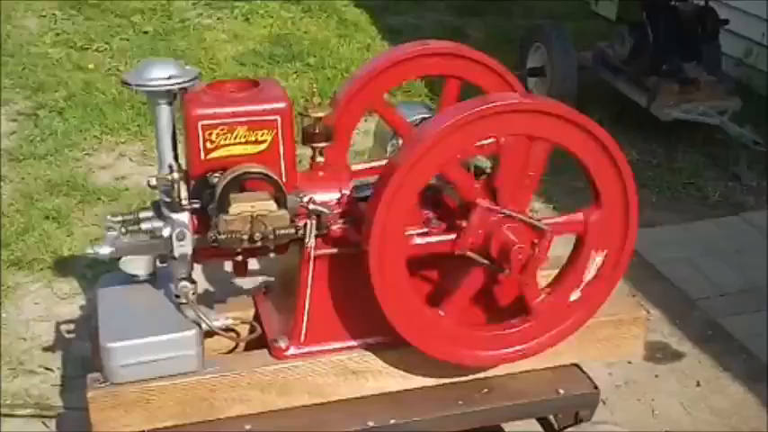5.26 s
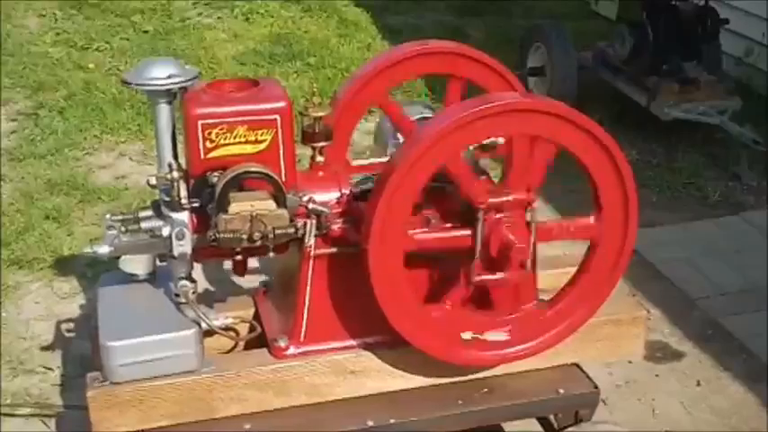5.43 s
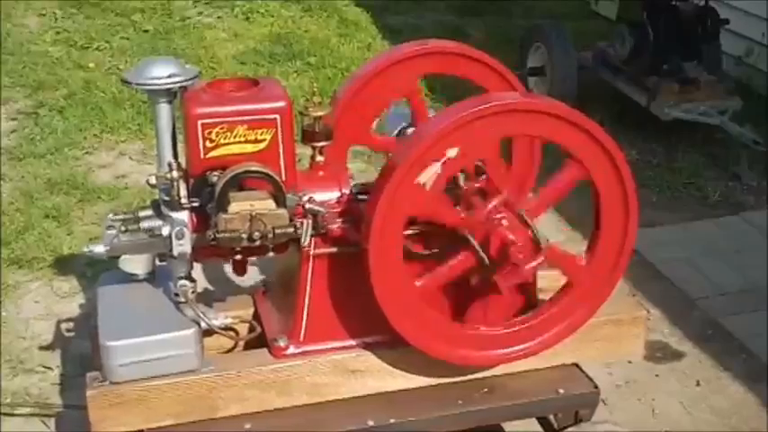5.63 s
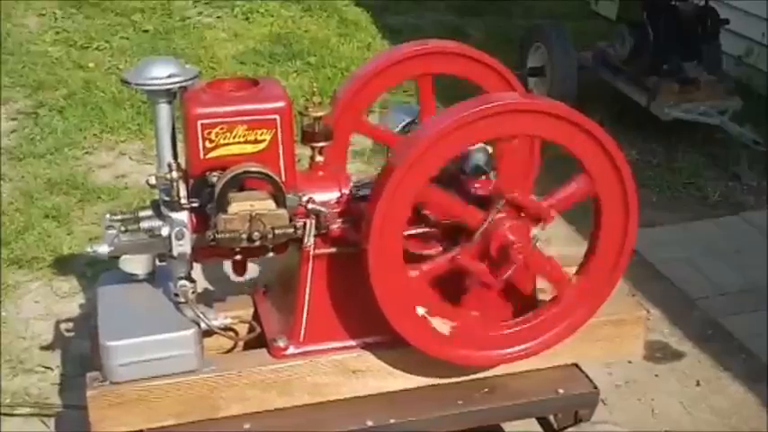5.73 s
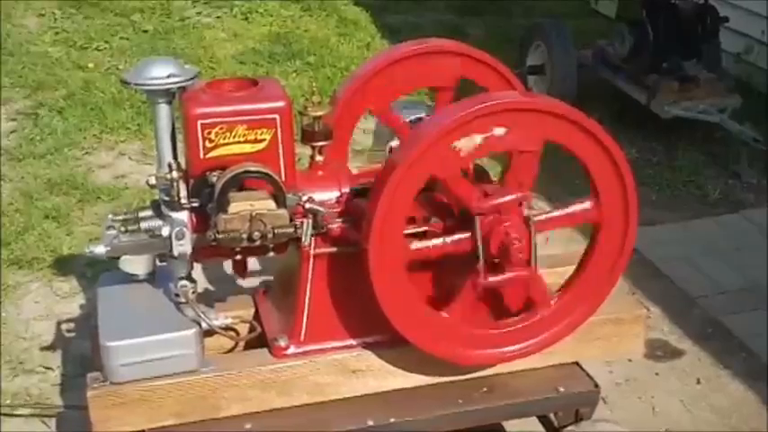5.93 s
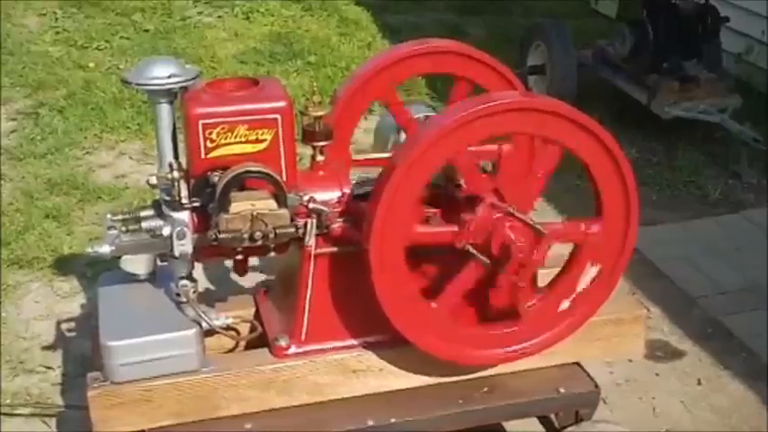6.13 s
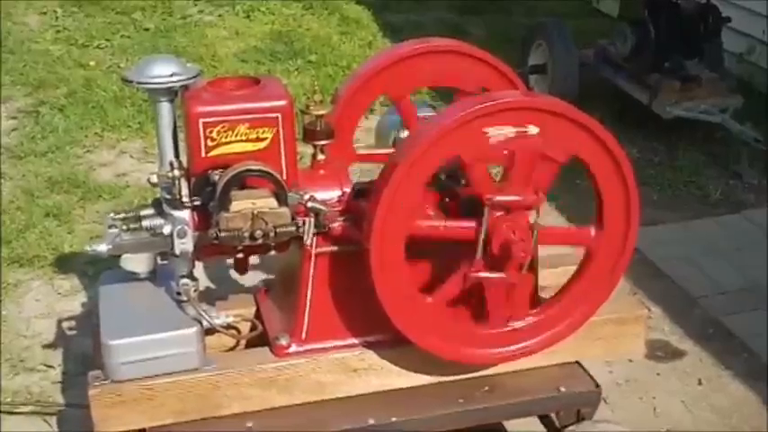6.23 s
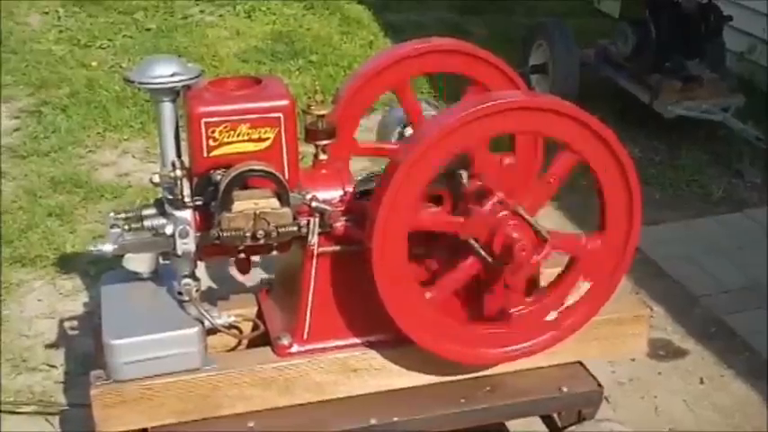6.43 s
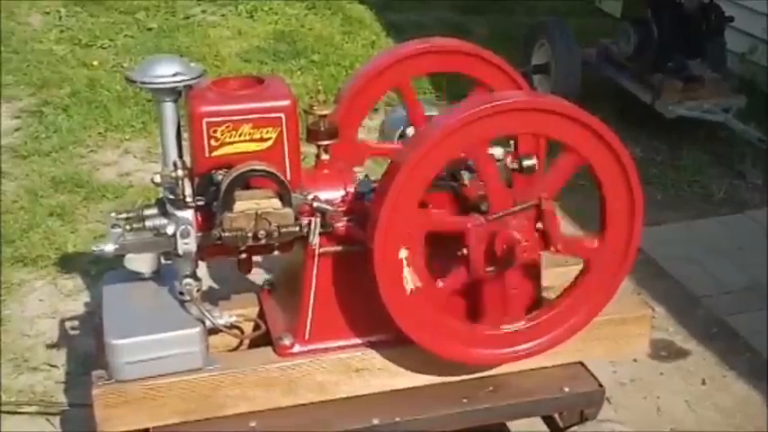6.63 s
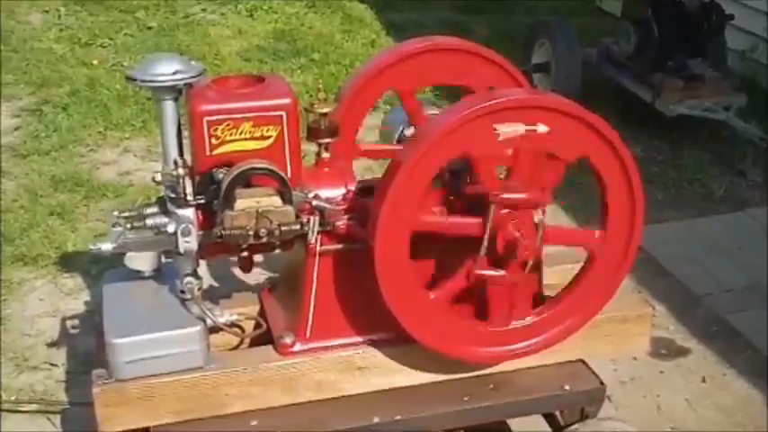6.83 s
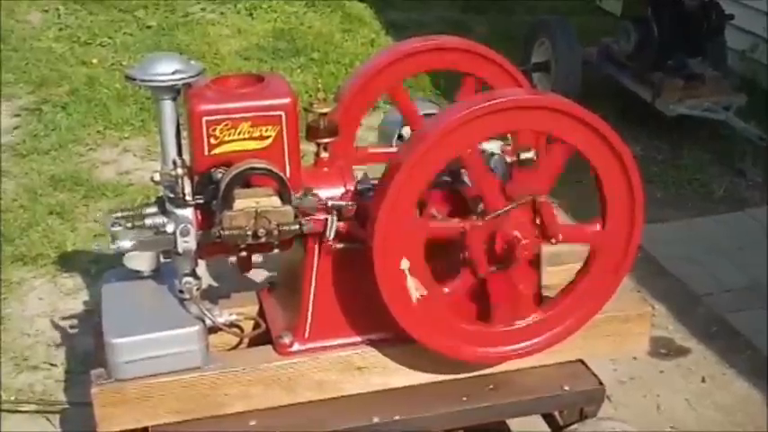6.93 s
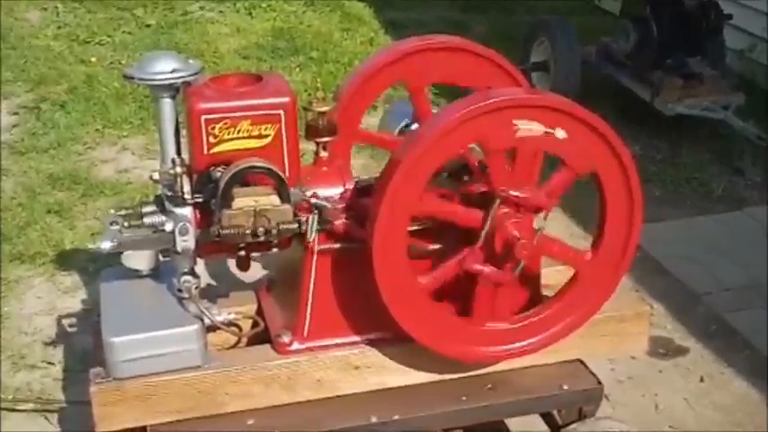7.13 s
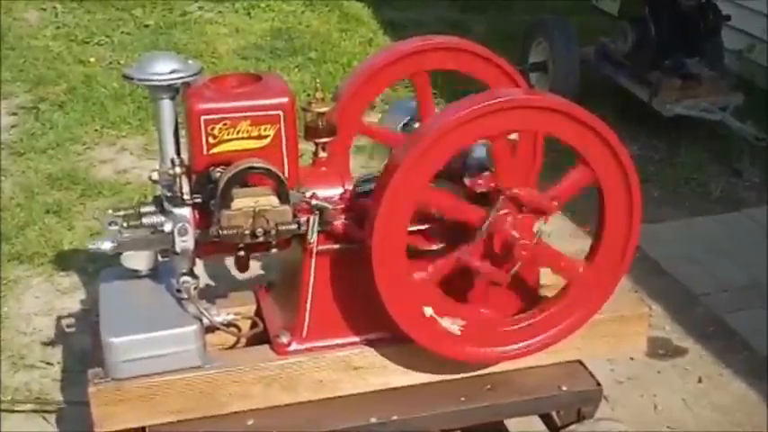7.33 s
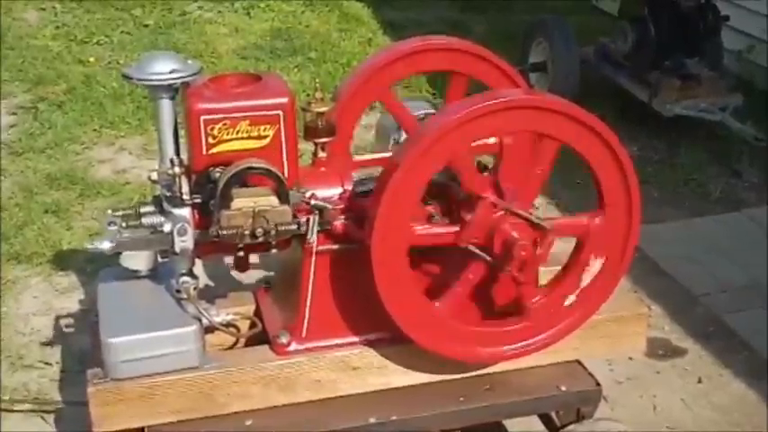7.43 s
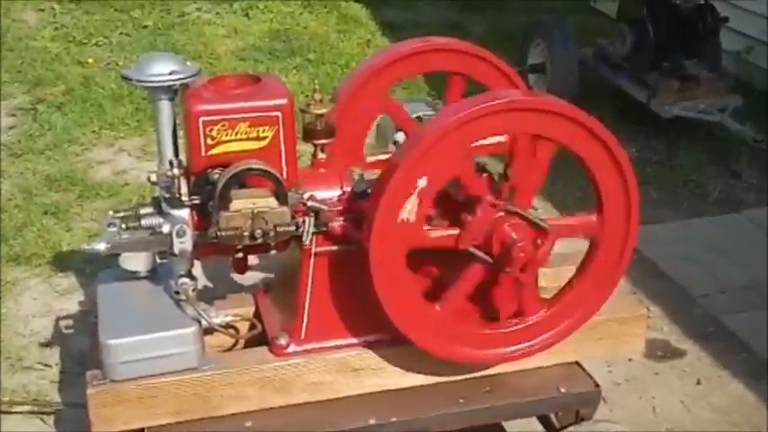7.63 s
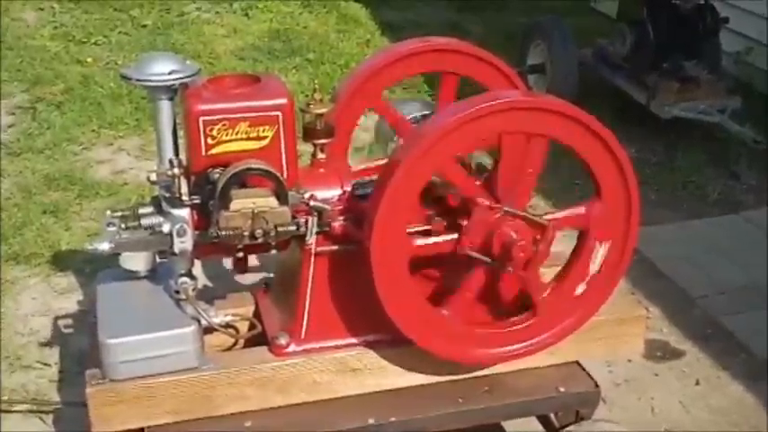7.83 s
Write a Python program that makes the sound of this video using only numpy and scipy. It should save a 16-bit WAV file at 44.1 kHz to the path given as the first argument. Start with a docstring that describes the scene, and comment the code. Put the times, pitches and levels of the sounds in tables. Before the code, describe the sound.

An old single-cylinder engine coasts with rhythmic iron clacks, fires with a loud bang, cuts to silence, then clacks on and fires again.

```python
"""A hit-and-miss engine coasts on a porch. Each turn of its slowing flywheels brings two clacks of the
valve gear, impacts that ring the iron, and two swells of sliding friction. It sucks in a charge past
a fluttering valve, trips its igniter and fires; the bang overloads the microphone, whose gain control
ducks. After a silent break the engine coasts on a lawn, its clacks drier, then fires once more and
runs on faster. Bearings hiss and the yard rumbles faintly in both places."""
import sys
import numpy as np
from scipy import signal
from scipy.fft import rfft, irfft, next_fast_len
from scipy.io import wavfile
from scipy.ndimage import uniform_filter1d

SR = 44100
rng = np.random.default_rng(int(sys.argv[2]) if len(sys.argv) > 2 else 0)


def unload_wav(signal):
    """Save mono or channel-first audio to the path in sys.argv[1] as 16-bit WAV at rate SR, clipped to [-1, 1]."""
    wavfile.write(
        sys.argv[1],
        SR,
        np.round(np.clip(np.atleast_2d(signal).T, -1, 1) * 32767).astype(np.int16),
    )


N = 347067
BREAK_S = (2.6, 3.364)  # start and end of the silence
TOP_HZ, USUAL_TURN_S = 15450, .28

# Coasting runs. Each row: start, end, first turn's length and lengthening per turn, all in seconds.
PORCH_COASTS = [(0.0055, 2.4, .2899, .00405)]
# Resonances of castings, skid and surroundings, then of steel rods and springs.
# Each row: centre in Hz, width in Hz, boost or dip in dB.
PORCH_PEAKS = [(251.6, 40.0, 21), (420, 63, 17.5), (580, 230, 7), (703, 107, 15), (836, 13, 16.5),
               (893, 27, 9.5), (937, 33, 11), (1070, 43.0, 1.5), (1260, 42.0, 9.5), (1340, 330, -13),
               (1469, 423, 31.5), (2362, 88, 7.5), (2700, 51.0, 6), (2955, 91, 7.5), (5370, 110, 2),
               (6230, 270, 0), (8235, 270, 9.5), (9770, 692.0, 10), (10860, 170, 10.5), (14281.0, 268.0, 2)]
STEEL_MODES = [(1960, 13, 6.5), (2297, 120, 4.5), (2564, 30, 2), (3337, 21, -10), (3750, 19, -3.5),
               (5650, 100, -1), (6360, 130, 8), (8774, 65, 8.5), (8700, 45, -10.5), (9000, 45, 0.5),
               (9300, 76, -6), (12000, 70, 6), (11967, 54, 6), (12646, 60, 9), (14000, 88, 14.5)]
# Modes of the igniter and its lever. Each row: centre in Hz, width in Hz, boost in dB.
IGNITER_MODES = [(423, 40, 13.5), (697, 70, 15.5)]
# Spectra of the two clacks, the rubbing and the lever trips. Each row: frequency in Hz, level in dB.
PORCH_FIRST_CLACK = [(60.0, -29), (130.0, -29.5), (240.0, 0), (450.0, -8.5), (750.0, -2.5), (1100.0, -1.5),
                     (1600.0, -5.5), (2600.0, 0), (3500.0, -7.5), (6000.0, -7.5), (9500.0, -15.5),
                     (15000.0, -22.5)]
PORCH_SECOND_CLACK = [(60.0, -25), (130.0, -31), (240.0, -2.5), (450.0, -18.5), (750.0, -9),
                      (1100.0, -17.5), (1600.0, -14), (2600.0, -7.5), (3500.0, -11), (6000.0, -14),
                      (9500.0, -19), (15000.0, -27.5)]
PORCH_RUB = [(60.0, -41), (130.0, -23), (240.0, -2.5), (450.0, -12.5), (750.0, -10), (1100.0, -7.5),
             (1600.0, -20), (2600.0, -20), (3500.0, -30.5), (6000.0, -32), (9500.0, -38.5), (15000.0, -43)]
TRIP_SPECTRUM = [(60, -13.5), (250, -3), (450, -2), (850, -6.5), (1500, -1.5), (3000, -4.5), (6000, -8.5),
                 (10000, -8.5), (15000, -17)]
# Friction swells of the low, middle and high band.
# Each row: first swell as a share of the turn, swing in dB, bias to the outward stroke in dB.
PORCH_SWELLS = [(0.32, 4, 1.5), (0.27, 4.5, 1.5), (0.3, 1, 3)]
# Knocks of loose play in gears and bearings. Each row: share of the turn, level in dB.
PORCH_KNOCKS = [(.54, -26), (.62, -33), (.80, -34), (.955, -27.5)]
# Trips of valve lever and igniter before the firing. Each row: start in seconds, level in dB.
PORCH_TRIPS = [(2.075, -15.5), (2.401, -15.5)]


def porch():
    """Impact and friction excite resonances; under the roof the clacks ring longer and the skid booms."""
    turns, peaks = flywheel(PORCH_COASTS), np.vstack([PORCH_PEAKS, STEEL_MODES])
    first, second = valve_gear(turns, PORCH_KNOCKS, first_db=-12, second_db=-18.5, second_share=.246,
                               tail_db=-2.5, rise_s=.006, bright_s=.005, fresh=.6, t60=.17)
    clacks = coloured(first, PORCH_FIRST_CLACK, peaks) + coloured(second, PORCH_SECOND_CLACK, peaks)
    lever = blows(PORCH_TRIPS, rise_s=.0058, bright_s=.0056, fresh=1.9, tail_db=3, t60=.21)
    trips = coloured(lever, TRIP_SPECTRUM, np.vstack([peaks * [1, 1, .5], IGNITER_MODES]))
    rub = amp(-22.5) * rubbing(turns, PORCH_SWELLS, PORCH_RUB, peaks, depth=.5, grit_db=1)
    swish = piston_swish(turns, .745, .073, glide_hz=(1064, 797), width_hz=270, tone_db=-25.5, hiss_db=-41)
    return clacks + trips + rub + swish


# Coasting runs. Each row: start, end, first turn's length and lengthening per turn, all in seconds.
LAWN_COASTS = [(3.2552, 7.1, .2557, .003665), (7.172, 7.87, .264, .0025)]
# Ringing resonances of the engine, plus broad treble boosts that brighten the clacks.
# Each row: centre in Hz, width in Hz, boost in dB.
LAWN_PEAKS = [(222, 40, 6.7), (268.7, 85, 13.7), (372.3, 28, 10.7), (504, 20, 8.4), (678, 64, 7.3),
              (877, 33, 7.6), (973, 71, 7), (1087, 33, 7.8), (1279, 25, 9.6), (1353, 53, 7.7),
              (1537, 136, 9.1), (1900, 317, 8.6), (2500, 505, 20), (2755, 185, 8.1), (3210, 42, 11.7),
              (5300, 210, 3.1), (5840, 100, 8.5), (8940, 2470, 14), (9760, 1000, 12.3), (10880, 2000, 8.9)]
# Spectra of the two clacks and the rubbing. Each row: frequency in Hz, level in dB.
LAWN_FIRST_CLACK = [(60.0, -37), (130.0, -33), (240.0, -21.5), (450.0, -13), (750.0, -0.5), (1100.0, -7),
                    (1600.0, -10), (2600.0, -26.5), (3500.0, -21), (6000.0, -17.5), (9500.0, -41.5),
                    (15000.0, -30)]
LAWN_SECOND_CLACK = [(60.0, -33), (130.0, -26), (240.0, -26), (450.0, -19), (750.0, -0.5), (1100.0, -12),
                     (1600.0, -14.5), (2600.0, -31.5), (3500.0, -24.5), (6000.0, -25), (9500.0, -44.5),
                     (15000.0, -37)]
LAWN_RUB = [(60.0, -49), (130.0, -11), (240.0, -12), (450.0, -9.5), (750.0, 1), (1100.0, -8.5),
            (1600.0, -19), (2600.0, -35), (3500.0, -31.5), (6000.0, -34.5), (9500.0, -56), (15000.0, -38)]
# Friction swells by band. Each row: share of the turn, swing in dB, outward bias in dB.
LAWN_SWELLS = [(0.3, 2, 1.2), (0.25, 3.5, 1.7), (0.34, 2.6, 2.4)]
# Knocks of loose play; those just before a clack take up slack. Each row: share of the turn, level in dB.
LAWN_KNOCKS = [(.215, -40), (.49, -33), (.585, -31.5), (.785, -33), (.975, -30)]
# Trips of valve lever and igniter. Each row: start in seconds, level in dB.
LAWN_TRIPS = [(6.977, -28), (7.126, -25), (7.133, -17)]


def lawn():
    """In the open the clacks decay sooner and sound thinner, and both piston strokes swish."""
    turns, peaks = flywheel(LAWN_COASTS), np.vstack([LAWN_PEAKS, STEEL_MODES])
    first, second = valve_gear(turns, LAWN_KNOCKS, first_db=-14.5, second_db=-18, second_share=.243,
                               tail_db=-7.5, rise_s=.0049, bright_s=.0033, fresh=.83, t60=.13)
    clacks = coloured(first, LAWN_FIRST_CLACK, peaks) + coloured(second, LAWN_SECOND_CLACK, peaks)
    lever = blows(LAWN_TRIPS, rise_s=.0074, bright_s=.0027, fresh=.84, tail_db=-8, t60=.26)
    trips = coloured(lever, TRIP_SPECTRUM, IGNITER_MODES)
    rub = amp(-27.5) * rubbing(turns, LAWN_SWELLS, LAWN_RUB, peaks, depth=.75, grit_db=2)
    inward = piston_swish(turns, .715, .06, (844.4, 633.6), width_hz=204, tone_db=-22.5, hiss_db=-45)
    scrape = piston_swish(turns, .775, .064, (1038, 1649), width_hz=640, tone_db=-30.5, hiss_db=-57)
    outward = piston_swish(turns, .34, .061, (957, 539), width_hz=53, tone_db=-33, hiss_db=-74)
    return clacks + trips + rub + inward + scrape + outward


def flywheel(coasts, db_per_doubling=3.5, fired_db=1):
    """Friction slows the wheels and level follows speed. Each row: a turn's start s, length s, dB."""
    turns = []
    for firings, (start, end, length, lengthening) in enumerate(coasts):
        while start < end:
            level = db_per_doubling * np.log2(USUAL_TURN_S / length) + fired_db * (firings > 0)
            turns.append((start, length, level))
            start, length = start + length, length + lengthening
    return np.array(turns)


def at_share(turns, share):
    """Times at which the crank passes a share of each turn."""
    starts, lengths, _ = turns.T
    return starts + share * lengths


def each_turn(turns, share, db, scatter_db=-.15):
    """Periodic impacts (s, dB) at one crank angle, no two equally hard."""
    return zip(at_share(turns, share), db + turns[:, 2] + scatter_db * noise(len(turns)))


def valve_gear(turns, play, first_db, second_db, second_share, tail_db, **contact):
    """Impact forces: the first clack with the soft knocks of backlash, and the second clack."""
    def unloaded(hits):
        """For a turn after each gulp of air the gear is under load and these hits drop out."""
        return [(s, db) for s, db in hits if not any(0 < s - gulp[0] < USUAL_TURN_S for gulp in GULPS)]

    first = blows(unloaded(each_turn(turns, 0, first_db)), tail_db=tail_db, rebound_db=-3.5, **contact)
    second_hits = each_turn(turns, second_share, second_db)
    second = blows(second_hits, tail_db=tail_db + 1, rebound_db=-7.5, **contact)
    knocks = unloaded(hit for share, db in play for hit in each_turn(turns, share, db, scatter_db=-.5))
    backlash = blows(knocks, rise_s=.0051, bright_s=.0036, fresh=1.5, tail_db=-5.5, t60=.037)
    dull, bright = split(backlash, 2300)
    return first + dull + amp(-13) * bright, second


def blows(hits, rise_s, bright_s, fresh, tail_db, t60, rebound_s=.009, rebound_db=-7):
    """Each impact (s, dB) is a recurring chatter with a fresh part, a dull rebound and a damped rattle."""
    contact = lambda: split(chatter(rise_s), 3000)[0] + split(chatter(bright_s), 3900)[1]
    usual, force, t = contact(), np.zeros(N), clock(SR // 3)
    for s, db in hits:
        size = amp(db) * np.sqrt(.02 * SR)  # the energy of 20 ms at this level
        add(force, s, size * (usual + fresh * contact()) / np.hypot(1, fresh))
        rebound_at = s + rebound_s * rng.uniform(.7, 1.3)
        add(force, rebound_at, size * amp(rebound_db) * split(chatter(rise_s / 2), 3300)[0])
        rattle = noise(len(t)) * amp(-60 * t / t60) * (1 - np.exp(-t / rise_s))
        add(force, s, size * amp(tail_db) * rattle / np.linalg.norm(rattle))
    return force


def chatter(rise_s, count=4096):
    """Iron meets iron in many tiny contacts: a broadband burst of unit energy."""
    age = clock(count) / rise_s
    envelope = age * np.exp(1 - age)
    burst = envelope * noise(count)
    for _ in range(3):  # flatten the spectrum, then restore the burst's outline
        burst = irfft(np.exp(1j * np.angle(rfft(burst)))) * np.sqrt(envelope)
    return burst / np.linalg.norm(burst)


# Firings. Each row: start in seconds, then levels of pressure wave, jet and echo in dB.
BANGS = [(2.4382, 5.5, 4.5, -3), (7.162, 4.5, 11, 0)]
# Spectra of the gas jet, its echo, and the rumble of yard and skid. Each row: frequency in Hz, level in dB.
JET_SPECTRUM = [(30, -24.5), (100, 2.5), (200, -3), (600, -5), (1300, -3.5), (2500, -11.5), (5500, -6.5),
                (9500, -2), (15000, -12)]
ECHO_SPECTRUM = [(40, -18), (250, -1.5), (500, -18), (1300, -2.5), (3000, -0.5), (6500, -6), (9700, 1),
                 (12000, -5), (15000, -14)]
RUMBLE_SPECTRUM = [(25, -13.5), (60, -8.5), (150, 1.5), (300, -0.5), (1000, -27), (4000, -32),
                   (15000, -41.5)]
# Resonances of the muffler. Each row: centre in Hz, width in Hz, boost in dB.
MUFFLER_MODES = [(240, 50, 11), (700, 160, 7), (1070, 55, 9), (1252, 54, 11), (1660, 80, 11.5),
                 (3300, 330, 4.5)]


def exhaust(push_s=.0007, jet_t60=.084, echo_t60=.24, shake_db=-33, shake_t60=4):
    """A pressure pulse leaves, a turbulent jet rings the muffler, the yard echoes, the skid shakes on."""
    wave, jet, echo, shake = np.zeros((4, N))
    t = clock(2 * SR)
    phase = t / push_s
    dying = lambda db, t60: amp(db - 60 * t / t60) * noise(len(t))
    for s, push_db, jet_db, echo_db in BANGS:
        add(wave, s - push_s, amp(push_db) * np.sin(phase) * np.exp(-np.minimum(phase / 5, 50)))
        add(jet, s, dying(jet_db, jet_t60) * (1 - np.exp(-(phase / 2) ** 2)))
        add(echo, s, dying(echo_db, echo_t60) * (1 - np.exp(-t / .00517)))
        add(shake, s, dying(shake_db, shake_t60))
    wave = highpass(wave, 130)  # a small outlet radiates little bass
    blast = wave + coloured(jet, JET_SPECTRUM, MUFFLER_MODES)
    return blast + coloured(echo, ECHO_SPECTRUM, MUFFLER_MODES) + coloured(shake, RUMBLE_SPECTRUM)


# Gulps of air. Each row: start in seconds, length in seconds, hiss in dB, snore in dB.
GULPS = [(1.909, 0.093, -22.5, -22), (2.094, 0.073, -27, -20.5), (2.224, .11, -21, -22.5),
         (6.966, 0.018, -20.5, -21.5), (7.012, 0.036, -22, -27.5)]
# Spectra of the intake's hiss and snore. Each row: frequency in Hz, level in dB.
AIR_SPECTRUM = [(60, -5.5), (400, -7), (1000, 7.5), (2300, 1), (3500, -9.5), (5500, -5.5), (7000, -10.5),
                (9500, -7.5), (15000, -18.5)]
SNORE_SPECTRUM = [(30, -20.5), (60, -11.5), (110, -16.5), (170, -11.5), (285, 4), (370, -7.5), (700, -8.5),
                  (1500, -29), (4000, -53.5)]
# Resonances of the intake pipe. Each row: centre in Hz, width in Hz, boost in dB.
PIPE_MODES = [(267, 30, 3.5), (418, 35.4, 1.5)]


def intake(flutter_hz=95, unsteady=.092, edge_s=.021, surge_db=1.5):
    """A fluttering valve chops the flow into puffs that excite the pipe, while air hisses past in surges."""
    hiss, snore = np.zeros(N), np.zeros(N)
    for s, length, hiss_db, snore_db in GULPS:
        t = clock(int((length + 4 * edge_s) * SR))
        envelope = np.minimum(t / edge_s, 1) * np.exp(-np.maximum(t - length, 0) / edge_s)
        flow = envelope * unit(amp(surge_db * wander(len(t), 500)))
        cycles = np.cumsum(flutter_hz * (1 + unsteady * wander(len(t), 200))) / SR
        puffs = unit(np.diff(np.floor(cycles), prepend=0))
        add(snore, s, amp(snore_db) * flow * unit(puffs + .32 * noise(len(t))))
        add(hiss, s, amp(hiss_db) * flow * noise(len(t)))
    return coloured(hiss, AIR_SPECTRUM) + coloured(snore, SNORE_SPECTRUM, PIPE_MODES)


def rubbing(turns, swells, spectrum, peaks, depth, grit_db):
    """Friction noise of piston, bearings and gears swells at mid-stroke and eases at the dead centres."""
    starts, _, level = turns.T
    edges = np.append(starts, at_share(turns, 1)[-1])
    angle = 2 * np.pi * np.interp(clock(), edges, np.arange(len(edges)))
    grit = amp(grit_db * wander(N, 90))
    friction = coloured(patchy(grit * noise(N), depth_db=2.5), spectrum, peaks, depth)
    low, upper = split(friction, 480)
    sound = np.zeros(N)
    for band, (share, swing_db, bias_db) in zip((low, *split(upper, 3500)), swells):
        crank = angle - 2 * np.pi * share
        sound += band * amp(swing_db * np.cos(2 * crank) + bias_db * np.cos(crank))
    return sound * amp(np.interp(clock(), at_share(turns, .93), level))


def piston_swish(turns, share, length_s, glide_hz, width_hz, tone_db, hiss_db):
    """Sliding is fastest near mid-stroke: a hollow, noise-driven resonance glides under an oily hiss."""
    hollow, hiss, t = np.zeros(N), np.zeros(N), clock(int(length_s * SR))
    swell = np.sin(np.pi * t / length_s) ** 2
    narrow = signal.butter(2, width_hz / 2, fs=SR, output="sos")
    for s, level in zip(at_share(turns, share), turns[:, 2]):
        hz = np.geomspace(*glide_hz, len(t)) * np.exp(rng.normal(0, .03))
        waver = signal.sosfilt(narrow, noise(len(t)) + 1j * noise(len(t)))
        tone = unit(np.real(waver * np.exp(2j * np.pi * np.cumsum(hz) / SR)))
        add(hollow, s - length_s / 2, amp(level + tone_db) * swell * tone)
        add(hiss, s - length_s / 2, amp(level + hiss_db) * swell * noise(len(t)))
    return hollow + coloured(hiss, spectrum=[(1000, -29), (4500, -4), (15000, -10)],
                             peaks=[(5560, 1300, 5.4), (9270, 1300, 8), (14000, 1200, 3.8)])


def patchy(x, depth_db, size=512):
    """Contact spots come and go, so narrow bands flare up for some 30 ms."""
    bands = signal.stft(x, nperseg=size)[2]
    flares = uniform_filter1d(noise(bands.shape), size=3, axis=0)
    flares = unit(uniform_filter1d(flares, size=6, axis=1))
    return unit(signal.istft(bands * amp(depth_db * flares), nperseg=size)[1][:len(x)])


# Hiss of the oiled bearings. Each row: frequency in Hz, level in dB.
BEARING_SPECTRUM = [(1000, -9.5), (3000, -5.5), (6000, -2.5), (9500, 8.5), (12000, -2), (15000, -8)]


def bearings():
    """Continuous friction in the oiled bearings excites the modes of the steel."""
    return coloured(patchy(noise(N), depth_db=8.5), BEARING_SPECTRUM, STEEL_MODES)


def coloured(x, spectrum, peaks=(), depth=1, size=8192):
    """Minimum-phase filter of unit power: a broad spectrum with peaks, of which the narrow ones ring on."""
    hz = np.fft.rfftfreq(size, 1 / SR)
    knots_hz, level = np.transpose(spectrum)
    gain = amp(np.interp(np.log(hz + 1), np.log(knots_hz), level) + depth * peak_curve(peaks, hz))
    cepstrum = irfft(np.log(gain + 1e-6))
    cepstrum[1:size // 2] *= 2  # folding the cepstrum makes the response causal
    cepstrum[size // 2 + 1:] = 0
    response = irfft(np.exp(rfft(cepstrum)) / np.sqrt(np.mean(gain ** 2 * (hz < TOP_HZ))))
    return signal.fftconvolve(x, response)[:len(x)]


def peak_curve(peaks, hz):
    """Lorentzian peaks and dips, summed in dB."""
    return sum(db / (1 + (2 * (hz - centre) / width) ** 2) for centre, width, db in peaks)


def split(x, hz):
    """The parts below and above a frequency."""
    low = signal.sosfiltfilt(signal.butter(2, hz, fs=SR, output="sos"), x)
    return low, x - low


def highpass(x, hz):
    """Second-order bass roll-off."""
    return signal.sosfilt(signal.butter(2, hz, "highpass", fs=SR, output="sos"), x)


def noise(shape):
    """White noise."""
    return rng.standard_normal(shape)


def wander(count, span):
    """Noise averaged over span samples, at rms 1."""
    return unit(uniform_filter1d(noise(count), size=span))


def amp(db):
    """Decibels to gain."""
    return 10 ** (np.asarray(db) / 20)


def unit(x):
    """Scale to rms 1."""
    return x / np.sqrt(np.mean(x ** 2) + 1e-20)


def clock(count=N):
    """Sample times in seconds."""
    return np.arange(count) / SR


def add(track, s, sound):
    """Mix a sound in at s seconds."""
    part = track[max(round(s * SR), 0):][:len(sound)]
    part += sound[:len(part)]


def scene():
    """Superposition: the engine, on the porch and then on the lawn, over bearing hiss and yard rumble."""
    engine = np.where(clock() < BREAK_S[0], porch(), lawn())
    hiss = amp(-56) * bearings()
    yard = amp(-50) * coloured(noise(N), RUMBLE_SPECTRUM)
    return (engine + hiss + intake() + exhaust() + yard)[None]


def gain_control(x, limit_db=-8, slope=1.312, attack_s=.0044, release_db_per_s=14):
    """Compression: a level above the limit pulls the gain down fast, and it creeps back."""
    level_db = 10 * np.log10(np.abs(uniform_filter1d(x ** 2, size=220)) + 1e-12)
    creep = release_db_per_s * clock()
    cut_db = np.maximum.accumulate(slope * np.maximum(level_db - limit_db, 0) + creep) - creep
    pole = np.exp(-1 / (attack_s * SR))
    return x * amp(-signal.lfilter([1 - pole], [1, -pole], cut_db))


def record(dry):
    """Bass roll-off, notches of the microphone port, gain control, clipping, the break and a band limit."""
    size = next_fast_len(N + SR // 2)
    hz = np.fft.rfftfreq(size, 1 / SR)
    port = amp(peak_curve([(7845, 570, -19), (10850, 180, -19.5)], hz))
    x = irfft(rfft(highpass(dry[0], 45), size) * port, size)[:N]
    x = np.clip(gain_control(x), -.9, .9)
    x *= (clock() < BREAK_S[0]) | (clock() > BREAK_S[1])
    band_limit = 1 / np.sqrt(1 + (hz / TOP_HZ) ** 400)
    return irfft(rfft(x, size) * band_limit, size)[None, :N]


dry = scene()
out = record(dry)
unload_wav(out)
```